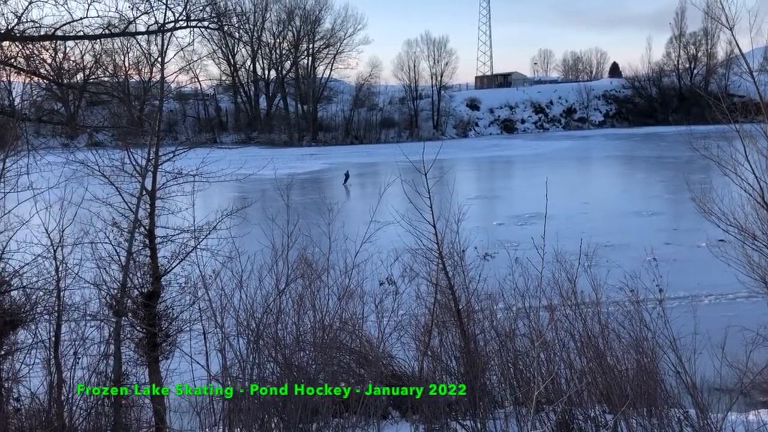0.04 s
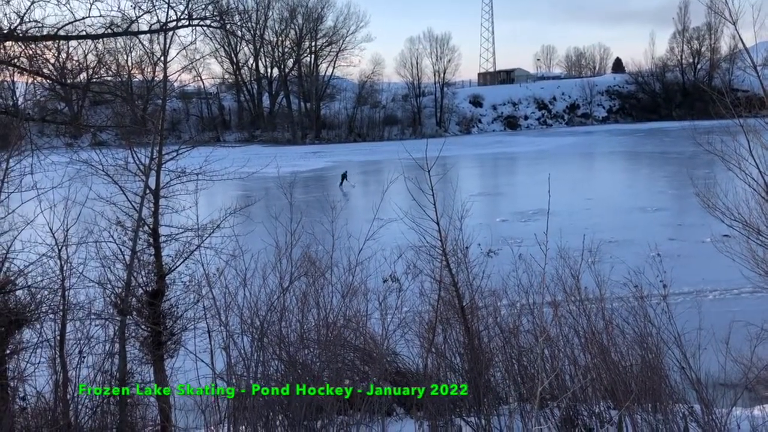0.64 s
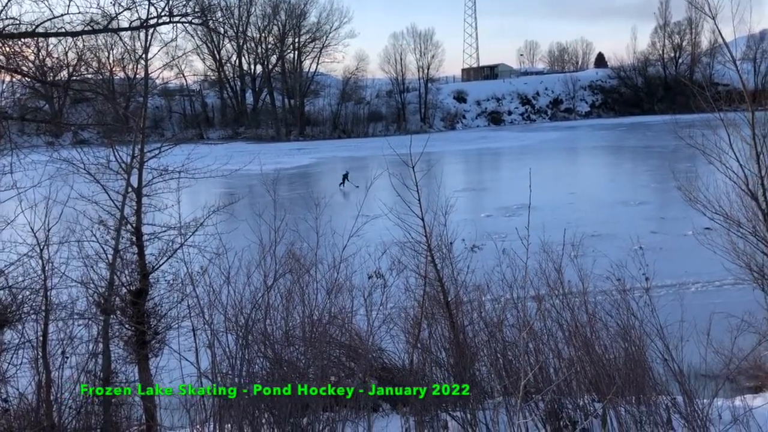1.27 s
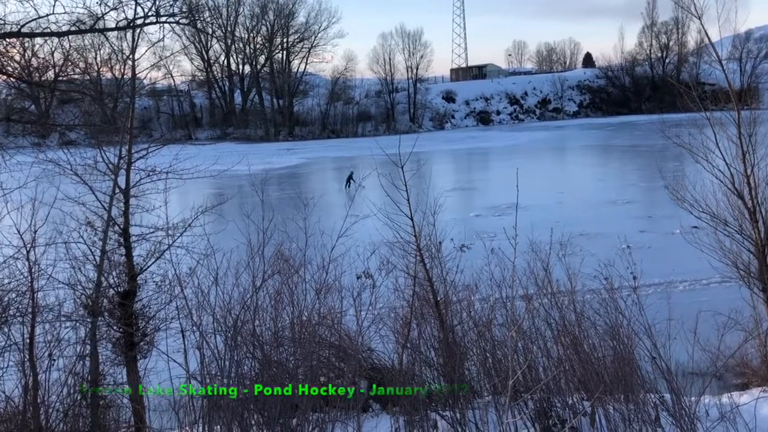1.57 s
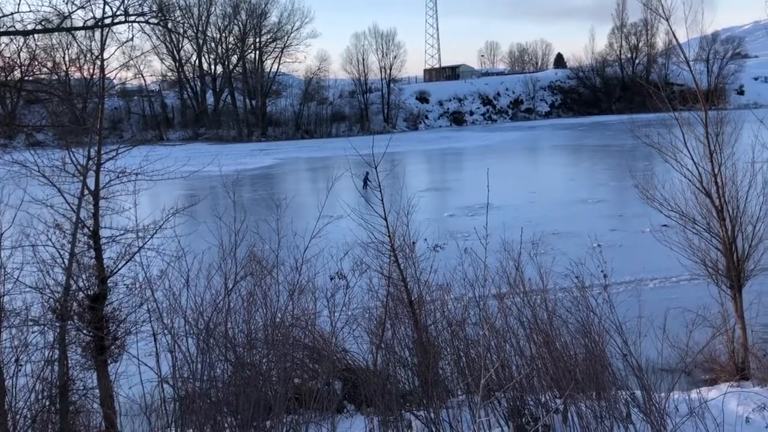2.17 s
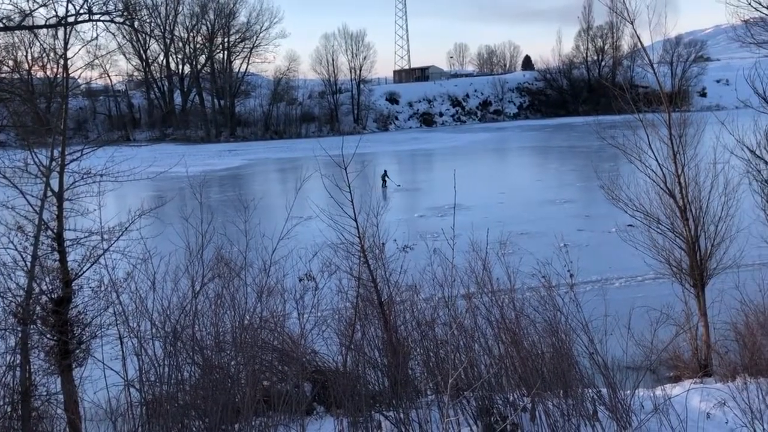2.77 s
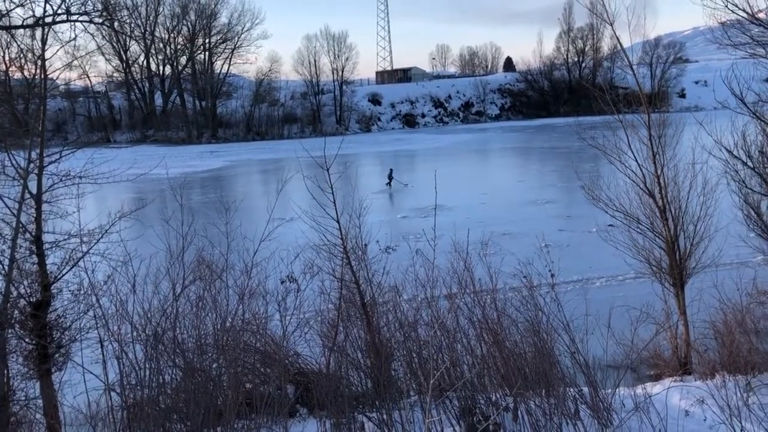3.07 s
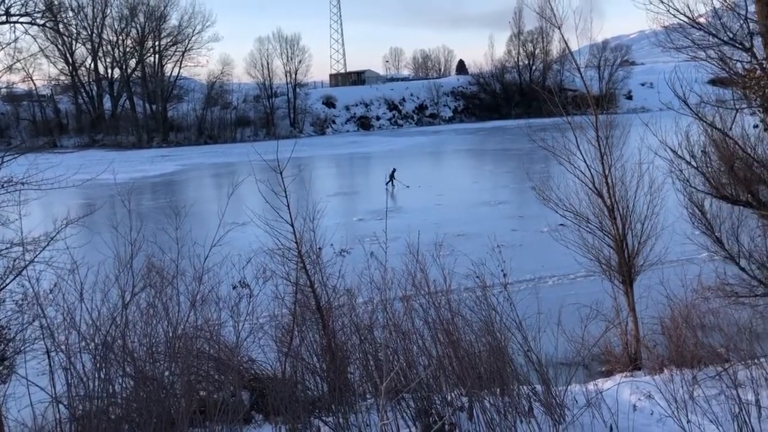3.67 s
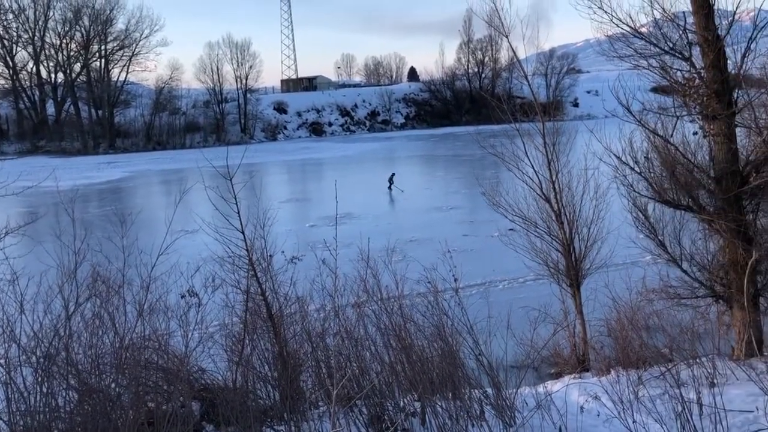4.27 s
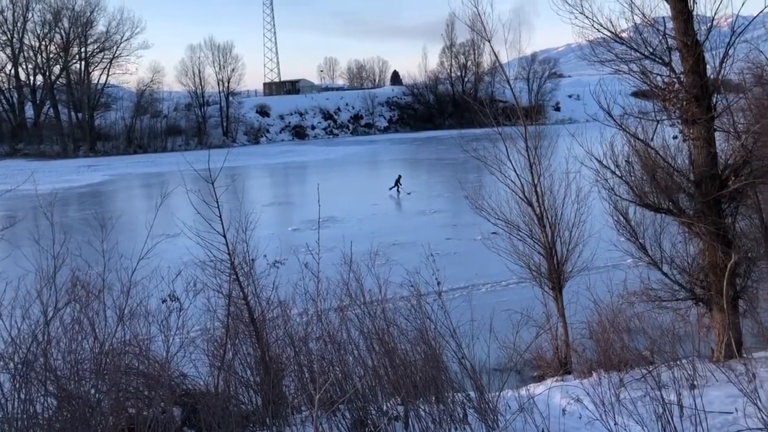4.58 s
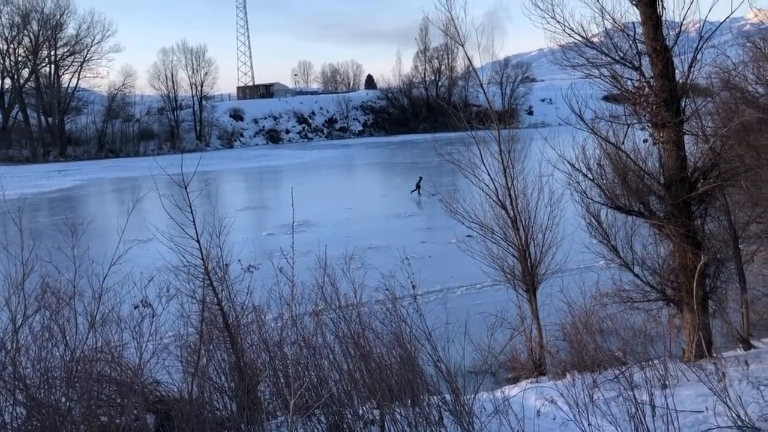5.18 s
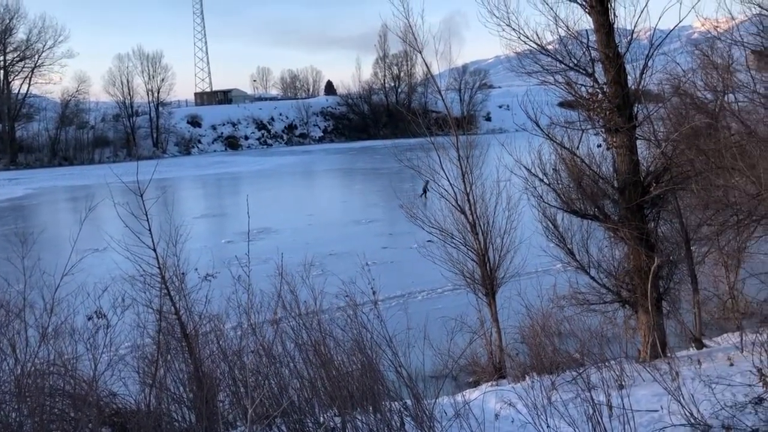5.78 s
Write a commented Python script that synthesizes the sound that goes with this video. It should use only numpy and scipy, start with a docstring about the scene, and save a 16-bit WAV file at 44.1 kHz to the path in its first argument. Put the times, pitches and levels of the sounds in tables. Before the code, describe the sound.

A distant hockey stick clacks a puck across a frozen lake, with short chirps in the ice, skate scrapes and a low outdoor rumble.

```python
"""A lone skater plays a hockey puck across a frozen lake, heard from the bank.
For three seconds stick and puck clack; each blow sends a short falling chirp through the ice,
and the wooded shore scatters it back. The hardest, at 2.5 s, knocks ice crystals loose.
Then the skater pushes off with scraping strokes and softer taps, and the ring of the blades fades.
A low outdoor rumble, a far hum and a faint whirr run throughout."""
import sys
import numpy as np
from scipy import signal
from scipy.fft import rfft, irfft, next_fast_len
from scipy.io import wavfile
from scipy.ndimage import uniform_filter1d

SR = 44100
rng = np.random.default_rng(int(sys.argv[2]) if len(sys.argv) > 2 else 0)


def transcribe(u):
    """Save the signal u as a 16-bit wav file named by the first command-line argument.

    u: samples, shape (n,) or (channels, n), limited to [-1, 1]; the rate is SR.
    q: integer samples, one column per channel.
    """
    v = np.clip(np.atleast_2d(u).T, -1, 1)
    q = np.round(v * 32767).astype(np.int16)
    wavfile.write(sys.argv[1], SR, q)


N = 257103
TIME = np.arange(N) / SR
SLOW = np.arange(0, N + 64, 64) / SR  # control grid in seconds

# Knocks of stick, puck and skate, plus one quick bank echo at 1.955 s.
# Each row: start in seconds, force in dB, brightness in dB, ice chirp in dB, edge tick in dB,
# tuning factor, rebound delay in ms, hollow band in Hz, shore send in dB.
KNOCK_EVENTS = [(0.2467, -10, 7, -25, -27.5, 0.93, 0.49, 1420, -1.5),
                (0.48, 1, 0, -15, -20.5, 0.92, 1.67, 3200, -5),
                (0.523, -6.0, -6, -16.5, -28, 0.9, 1.9, 980, -12),
                (0.7358, -1, -1, -13, -25, 0.9, 0.45, 2550, 2),
                (0.738, -7, 15.5, -38, -43, 1.02, 2.0, 2450.0, -6.5),
                (0.808, -3, -2.5, -8.5, -28, 0.87, 1.7, 2830.0, -9),
                (0.8442, -17, -7.5, -13.5, -41, 1, 0.52, 4060.0, -5),
                (1.0424, 4.0, 2.5, -17, -23, 0.92, 1.5, 4650, 0.0),
                (1.1163, -0.5, 3, -7, -39, 0.86, 0.56, 1520, -8),
                (1.3306, -2.5, 0.5, -10.5, -31, 0.98, 1.17, 780, 1),
                (1.3753, -3, 2.5, -2, -25, 0.76, 0.3, 1690, -6.5),
                (1.3826, -13, 4, -32, -50, 1, 0.53, 900, -6), (1.4, -7.5, -5, -17, -52, 0.67, 1, 1050, -3),
                (1.4179, -20, -10.0, -10, -42, 0.96, 2.1, 1410.0, -8),
                (1.577, 2.0, -2, -26, -23, 1, 1.6, 810, 1.0),
                (1.582, -1.5, -10, -16, -46.0, 0.8, 1.82, 820, -3.5),
                (1.6315, -4, -5, -9, -35, 0.79, 1.5, 1670.0, -6.5),
                (1.6508, -11.0, 4, -25, -43.0, 1.17, 1, 1600.0, 0.0),
                (1.6599, -9, -4.5, -30.0, -50.0, 1.05, 0.47, 2970.0, -8),
                (1.6835, -11, -1, -30.0, -50.0, 1, 0.51, 1470.0, -3),
                (1.7052, -19.5, 8, -8.5, -45.5, 1, 0.42, 880.0, -8),
                (1.888, 3.5, -0.5, -29, -27.5, 1.08, 1.09, 870, -3),
                (1.9397, 1, 3.5, -2, -21.5, 0.74, 1.56, 3330, -3.5),
                (1.9554, -9, 1, -18, -45, 0.85, 0.65, 2600, -6),
                (2.006, -8.5, -7, -15, -37, 0.53, 0.5, 900.0, -7),
                (2.111, -11, -9, -27, -36, 0.95, 1.05, 1870, 1),
                (2.1693, 2.0, -9, -15, -20, 1.08, 1.2, 900, 1.5),
                (2.2387, -12.5, -4.5, -29, -49.0, 1.1, 0.74, 3960.0, 6),
                (2.2615, -5, 2.5, -9, -29.5, 1.17, 0.42, 2440.0, 0.0),
                (2.516, 7.3, 3, -7.0, -36, 1.064, 1.05, 4300, -2.5),
                (2.739, -7, -2.5, -15, -49, 1.03, 0.81, 5000.0, -1),
                (2.749, -16, 3, -28, -50, 1.05, 0.55, 1300, -3),
                (2.7674, -14.5, 6, -16, -43, 1, 0.69, 1430.0, -8),
                (2.7872, -15, -1, -23, -47.0, 1.16, 1.66, 2440, 0),
                (2.7985, -18, 0, -28, -46, 1.1, 0.75, 1500, -3),
                (2.9005, -15, -2, -13, -47, 1.1, 0.63, 3170.0, 6),
                (2.905, -15, -0.5, -27, -45, 1.1, 1.2, 2500, 3),
                (2.9553, -15, -6.0, -18, -49.5, 1.34, 0.56, 1660.0, 0),
                (2.9957, -8, -8, -4.5, -32, 1.02, 0.43, 1290.0, -4),
                (3.008, -19, -1, -24, -44, 0.96, 0.7, 1500, -1),
                (3.8301, -13.5, 5.5, -30.0, -44, 0.82, 1.76, 2550, 4.5),
                (3.8485, -22, -11, -16.5, -60, 0.74, 1.3, 2395, 3),
                (3.931, -18, 2, -14, -48, 0.9, 1.6, 1900, 1),
                (3.958, -23, -10, -13.5, -60, 0.81, 0.8, 2190, 2),
                (3.9875, -17.5, -7, -14, -60, 0.82, 0.74, 2800, 1),
                (4.008, -18, -10, -21, -60, 0.96, 0.78, 2500, 3),
                (4.059, -20, -12, -6.5, -55, 1.1, 0.73, 1900, -2),
                (4.081, -19, -12, -20, -60, 0.95, 0.6, 2800, -7),
                (4.647, -11.5, -8, -22, -33, 1.07, 1.73, 2190, 4.5),
                (4.71, -18, -2, -14, -48.5, 0.97, 1.3, 1880.0, 6),
                (4.7878, -14.5, -8, -23, -44, 1.15, 0.72, 3210, 0.5),
                (4.8399, -24, 10, -19.0, -55, 0.85, 0.39, 2030.0, -3.5)]


def knocks():
    """All knocks, as heard directly and as sent towards the shore."""
    direct, outward = np.zeros((2, N))
    lead_samples = 128  # room for the graze before the hit
    for start_s, *settings, send_db in KNOCK_EVENTS:
        sound = np.roll(blow(*settings), lead_samples)
        add(direct, start_s - lead_samples / SR, sound)
        add(outward, start_s - lead_samples / SR, amp(send_db) * sound)
    return direct, outward


def blow(force_db, bright_db, ice_db, tick_db, tuning, rebound_ms, hollow_hz):
    """One blow rings the stick, chips the surface and bends the ice."""
    hz = np.fft.rfftfreq(4096, 1 / SR)
    clack = stick(hz, force_db, bright_db, tuning, hollow_hz) * contact(hz, force_db, rebound_ms)
    return irfft(clack + edge_tick(hz, tick_db) + ice_chirp(hz, ice_db))


# Low, main and high mode of the stick blade. Each row: centre in Hz before tuning, width in Hz.
STICK_MODES = [(1180, 850), (1900, 1150), (3200, 1530)]
# Hollow wooden shaft modes. Each row: centre in Hz, width in Hz, level in dB at 0 dB force.
SHAFT_MODES = [(1135, 230, -4), (3460, 260, -17)]


def stick(hz, force_db, bright_db, tuning, hollow_hz, radiate_hz=400, lag_s=0.00121):
    """Spectrum of the ringing blade and shaft; the main mode grows faster than the force."""
    modes_db = (force_db - 3.8 - 0.25 * bright_db, 1.388 * force_db, force_db - 10 + bright_db)
    power = sum((amp(db) * bell(hz, centre * tuning, width)) ** 2
                for db, (centre, width) in zip(modes_db, STICK_MODES))
    power += sum((amp(db + force_db) * bell(hz, centre, width)) ** 2 for centre, width, db in SHAFT_MODES)
    power /= 1 + (radiate_hz / (hz + 1)) ** 4  # a thin stick radiates little bass
    hollow = 1 - 0.83 * bell(hz, hollow_hz, 0.13 * hollow_hz)  # the struck spot leaves one band weak
    delay_s = lag_s / (1 + hz / STICK_MODES[1][0])  # the stick bends, so low modes sound late
    return causal(np.sqrt(power) * hollow) * np.exp(-2j * np.pi * hz * delay_s)


def contact(hz, force_db, rebound_ms, graze_s=0.00076, rebound_top_hz=4200, crunch_top_hz=5000):
    """Spectrum of the contact: a graze, crunching ice, the unit hit and a softer rebound."""
    graze = 0.22 * np.exp(2j * np.pi * hz * graze_s * rng.uniform(0.7, 1.3))
    crunch = amp(-11 - 0.24 * force_db) * burst(hz, decay_s=0.0026)
    crunch *= np.exp(2j * np.pi * hz * graze_s) / (1 + (hz / crunch_top_hz) ** 2)
    rebound = 0.47 * np.exp(-(hz / rebound_top_hz) ** 2 - 2j * np.pi * hz * rebound_ms / 1000)
    return graze + crunch + 1 + rebound


# Tick of hard edges. Each row: frequency in Hz, gain in dB.
TICK_COLOUR = [(1500, -25), (4000, 6), (6000, 1), (8000, -7), (11000, -13), (16000, -24)]


def edge_tick(hz, db, chip_gain=0.85):
    """Spectrum of hard edges meeting: one sharp snap, then flying chips."""
    snap = np.sqrt(1 - chip_gain ** 2)
    chips = chip_gain * burst(hz, decay_s=0.0011)
    return (snap + chips) * causal(amp(db + read(TICK_COLOUR, hz)))


# Bending wave of the ice sheet. Each row: frequency in Hz, gain in dB.
CHIRP_COLOUR = [(60, -39), (120, -24), (190, -6), (300, 7), (450, -1.5), (650, -0.5), (950, -11.5),
                (1600, -61), (4000, -72)]


def ice_chirp(hz, db, spread_s=0.00519, lag_s=0.00072, reference_hz=1000):
    """Spectrum of a bending wave: speed goes with the root of frequency, so lows arrive last."""
    turns = spread_s * (2 * np.sqrt(reference_hz * hz) - hz) + lag_s * hz
    return amp(db + read(CHIRP_COLOUR, hz)) * np.exp(-2j * np.pi * turns)


# Each row: start in seconds, pitch in Hz, t60 in seconds, level in dB.
RINGING_MODES = [(.7382, 3550, 0.024, -31), (.7382, 2890, 0.015, -40), (0.7393, 4050, .012, -41),
                 (0.736, 8800, 0.004, -43), (1.0429, 10700, 0.0024, -35.5), (1.0429, 3430, 0.016, -41),
                 (1.3751, 8000, 0.002, -39), (1.4, 1110, 0.031, -45), (2.1694, 2300, 0.015, -52),
                 (2.516, 2900, 0.015, -36), (2.515, 3690, 0.011, -32)]


def rings():
    """Hard hits set the shaft or a steel runner ringing briefly."""
    t, out = TIME[:SR // 10], np.zeros(N)
    for start_s, hz, t60_s, db in RINGING_MODES:
        add(out, start_s, amp(db) * np.sin(2 * np.pi * hz * t) * decay(t, t60_s))
    return out


# Skate strokes. Each row: peak time in seconds, length in seconds, scrape in dB, spray in dB.
SKATE_STROKES = [(0.179, 0.026, -56.5, -77), (0.358, 0.16, -68.5, -72), (1.012, 0.026, -56.5, -73),
                 (2.66, 0.039, -61, -77), (2.709, 0.019, -53.5, -69), (2.792, 0.063, -58.5, -76),
                 (3.013, 0.07, -64, -71), (3.479, 0.028, -62.5, -68.5), (3.586, 0.044, -50.5, -69),
                 (3.728, 0.28, -61.5, -85), (3.891, 0.015, -56, -80), (4.042, 0.034, -58.5, -85),
                 (4.186, .03, -74, -71), (4.577, 0.057, -53, -78), (5.115, 0.061, -55.5, -84),
                 (5.688, 0.054, -53.5, -72)]
# Scraping blade and its ice spray. Each row: frequency in Hz, gain in dB.
SCRAPE_COLOUR = [(200, -34), (500, -22), (800, -2.5), (960, -7), (1130, 2.5), (1400, -0.5), (1700, -2.5),
                 (2100, -6.5), (3000, -12), (3600, -11.5), (5000, -16), (6500, -29.5), (16000, -38)]
SPRAY_COLOUR = [(1500, 2), (4500, 10), (6500, 4), (8500, 7.5), (11000, -4), (16000, -7)]


def strokes(rise_share=0.57, roundness=1.56):
    """Each push swells into a gritty scrape and throws spray."""
    scrape_power, spray_power = np.zeros((2, len(SLOW)))
    for peak_s, length_s, scrape_db, spray_db in SKATE_STROKES:
        slope_s = length_s * np.where(SLOW < peak_s, rise_share, 1 - rise_share)
        push = np.exp(-(abs(SLOW - peak_s) / slope_s) ** roundness)
        scrape_power += push * amp(scrape_db) ** 2
        spray_power += push * amp(spray_db) ** 2
    bite = unit(friction(patchy_db=3.6, chatter_db=2.8)) + grit(per_s=480, spread_db=2.3)
    scratch = unit(friction(patchy_db=3.2, chatter_db=4.5)) + 0.7 * grit(per_s=220, spread_db=2.5)
    scrape = smooth(np.sqrt(scrape_power)) * equalised(bite, SCRAPE_COLOUR)
    spray = smooth(np.sqrt(spray_power)) * equalised(scratch, SPRAY_COLOUR)
    return scrape + spray


def carve(pitch_hz=1220, width_hz=380, relative_db=-7.5, climb_share=0.14):
    """The edge digs in before each scrape with a narrow ring that climbs with pressure."""
    power, pressure = np.zeros((2, len(SLOW)))
    for peak_s, length_s, scrape_db, _ in SKATE_STROKES:
        dig_s = peak_s - 0.73 * length_s
        power += amp(scrape_db + relative_db) ** 2 * np.exp(-((SLOW - dig_s) / (0.63 * length_s)) ** 2)
        pressure = np.maximum(pressure, np.exp(-(2 * (SLOW - peak_s) / length_s) ** 2))
    slips = coloured(rng.standard_normal(N), lambda hz: bell(hz, 0, width_hz))
    return smooth(np.sqrt(power)) * unit(slips * tone(pitch_hz * (1 + climb_share * pressure)))


# Skate blade modes. Each row: centre in Hz, width in Hz, gain in dB.
RUNNER_MODES = [(758, 480, -8), (1230, 210, -11), (1884, 380, 2), (3280, 2200, -27)]
# Glide envelope. Each row: time in seconds, level in dB.
GLIDE_FADE = [(0, -64), (.2, -59), (.45, -62), (.7, -64), (1.3, -66.5), (2.5, -73.5), (5.83, -88)]


def glide(waver_db=0.7):
    """Friction rings the gliding blades; they fade as the skater moves off."""
    ring = resonated(friction(patchy_db=3.5, chatter_db=2.6), RUNNER_MODES)
    level_db = np.interp(SLOW, *np.transpose(GLIDE_FADE)) + waver_db * drift(rate_hz=3.9)
    return smooth(amp(level_db)) * ring


def friction(patchy_db, chatter_db):
    """A blade catches on uneven ice: brief patches at their own pitches, and a shared chatter."""
    frames = dict(fs=SR, nperseg=512, noverlap=384)
    spectra = signal.stft(rng.standard_normal(N), **frames)[2]
    patches = uniform_filter1d(rng.standard_normal(spectra.shape), size=4, axis=0)
    patches = unit(uniform_filter1d(patches, size=5, axis=1))
    rub = signal.istft(spectra * amp(patchy_db * np.clip(patches, -2, 2)), **frames)[1]
    return rub[:N] * smooth(amp(chatter_db * drift(rate_hz=69)))


def grit(per_s, spread_db):
    """Tiny ice fractures: random clicks, a few larger than the rest."""
    sizes = amp(spread_db * np.minimum(rng.exponential(1, N), 3.5))
    return unit(sizes * impulses(N, per_s))


# Each row: start in seconds, centre in Hz, width in Hz, t60 in seconds, level in dB.
CRYSTAL_SHOWERS = [(2.52, 5400, 3200, .5, -67), (2.6995, 10500, 7010, .04, -62.5),
                   (2.707, 11000, 7000, .06, -72.5), (2.768, 13000, 6000, .06, -72),
                   (2.78, 9700, 1800, 0.55, -77), (3.007, 11800, 7000, .03, -68)]


def showers():
    """Crystals knocked loose by stick or blade burst out and skitter to rest."""
    out = np.zeros(N)
    for start_s, centre_hz, width_hz, t60_s, db in CRYSTAL_SHOWERS:
        grains = coloured(grit(per_s=5000, spread_db=2), lambda hz: bell(hz, centre_hz, width_hz))
        add(out, start_s, amp(db) * grains * decay(TIME, t60_s))
    return out


# Tiny fractures. Each row: frequency in Hz, gain in dB.
CRACKLE_COLOUR = [(300, -14), (1200, 0), (3500, 0), (5500, -9), (8000, -19), (16000, -36)]


def crackle(db=-70, fade_db_per_s=0.74, snap_s=0.0016):
    """The ice ticks faintly under the runners all the way."""
    fractures = grit(per_s=100, spread_db=3.4)
    snap = rng.standard_normal(400) * np.exp(-TIME[:400] / snap_s)
    ticks = signal.fftconvolve(fractures, snap)[:N]
    return amp(db - fade_db_per_s * TIME) * equalised(ticks, CRACKLE_COLOUR)


# The bank's slap comes later as the skater moves. Each row: time in seconds, delay in seconds.
SLAP_DELAY = [(.5, 0.0091), (1.05, 0.011), (1.65, 0.011), (1.85, .015), (2.5, 0.015)]
# Side shore decay. Each row: frequency in Hz, t60 in seconds.
SHORE_DECAY = [(200, 0), (1000, 0.53), (2500, 0.33), (5000, 0.17), (12000, 1.2)]
# Scatter from both shores. Each row: frequency in Hz, gain in dB.
ECHO_COLOUR = [(150, -7), (450, -11), (680, 9.5), (950, -1), (1300, -.5), (1900, 0.5), (3200, 2), (4200, 3),
               (5300, 0.5), (6800, -5), (9000, -5), (16000, -2)]


def lake(direct, outward, bank_db=-15, bank_top_hz=3500, brush_db=-15, shore_db=-10, far_db=-19):
    """The near bank adds one slap, the brush a brief smear, the side and far shores a long tail."""
    delay_s = np.interp(TIME, *np.transpose(SLAP_DELAY))
    slap = np.interp(TIME - delay_s, TIME, direct)
    slap = signal.lfilter(*signal.butter(1, bank_top_hz, fs=SR), slap)
    brush = scatter(direct, [(300, 0.05), (8000, 0.035)], [(300, -1), (3000, 0), (12000, -1)],
                    start_s=0.0015, build_s=0.0005, uneven_db=3)
    shore = scatter(outward, SHORE_DECAY, ECHO_COLOUR, start_s=0.009, build_s=0.004, uneven_db=4.6)
    far = scatter(outward, [(300, 0.5), (2000, 0.54), (9000, 0.93)], ECHO_COLOUR,
                  start_s=0.06, build_s=0.0081, uneven_db=4)
    return direct + amp(bank_db) * slap + amp(brush_db) * brush + amp(shore_db) * shore + amp(far_db) * far


def scatter(x, t60_by_hz, db_by_hz, start_s, build_s, uneven_db, paths=3, switch_hz=4):
    """Uneven echoes build up and die band by band; paths take turns as the skater moves."""
    out = np.zeros(N)
    for path in range(paths):
        taps = impulses(SR, per_s=1700) * amp(uneven_db * np.clip(rng.standard_normal(SR), -2, 2))
        taps *= 1 - np.exp(-TIME[:SR] / build_s)
        hz, t, spectra = signal.stft(taps, SR, nperseg=128)
        t60_s = np.maximum(read(t60_by_hz, hz), 1e-3)[:, None]
        tail = signal.istft(spectra * decay(t, t60_s) * amp(read(db_by_hz, hz))[:, None], SR)[1]
        active = np.floor(TIME * switch_hz) % paths == path
        add(out, start_s, signal.fftconvolve(x * active, tail / np.linalg.norm(tail)))
    return out


# Open air. Each row: frequency in Hz, gain in dB.
AIR_COLOUR = [(20, -42), (30, -39), (40, -11), (65, -8.5), (130, 3), (240, -1), (450, -11.5), (650, -11),
              (900, -15), (1300, -16.5), (2400, -22.5), (4000, -27.5), (6500, -35.5), (11000, -41.5),
              (16000, -44)]
# Rumble envelope. Each row: time in seconds, level in dB.
RUMBLE_SWELL = [(0, -56.5), (.7, -58), (2.6, -55), (3.5, -59.5), (5, -55.5), (5.83, -56.5)]


def air(swell_db=1.1, hiss_db=-57, split_hz=900):
    """Open air: a swelling low rumble under a steady thin hiss."""
    wash = equalised(rng.standard_normal(N), AIR_COLOUR)
    rumble = signal.sosfiltfilt(signal.butter(2, split_hz, fs=SR, output="sos"), wash)
    rumble_db = np.interp(SLOW, *np.transpose(RUMBLE_SWELL)) + swell_db * drift(rate_hz=2.35)
    return smooth(amp(rumble_db)) * rumble + amp(hiss_db) * (wash - rumble)


def hum(db=-65.3, pitch_hz=112.3, wander_hz=4, waver_db=2):
    """A far hum wavers in pitch and level."""
    sine = tone(pitch_hz + wander_hz * drift(rate_hz=9.5))
    return amp(db) * unit(sine * smooth(amp(waver_db * drift(rate_hz=2.5))))


# Each row: centre in Hz, width in Hz, gain in dB.
WHIRR_BANDS = [(1183, 160, -0.5), (1600, 105, 0)]


def whirr(db=-71):
    """Two faint narrow noise bands from far away."""
    return amp(db) * resonated(rng.standard_normal(N), WHIRR_BANDS)


def amp(db):
    """Decibels to gain."""
    return 10 ** (db / 20)


def unit(x):
    """Scales to rms 1."""
    return x / np.sqrt(np.mean(x ** 2) + 1e-20)


def read(points, hz):
    """Reads a table on a log-frequency axis."""
    knots_hz, values = np.transpose(points)
    return np.interp(np.log(hz + 1), np.log(knots_hz + 1), values)


def add(mix, start_s, sound):
    """Mixes a sound in at start_s."""
    part = mix[max(round(start_s * SR), 0):][:len(sound)]
    part += sound[:len(part)]


def bell(hz, centre, width):
    """Gain of one damped resonance."""
    return 1 / (1 + (2 * (hz - centre) / width) ** 2)


def decay(t, t60_s):
    """Falls 60 dB in t60_s."""
    return amp(-60 * t / t60_s)


def coloured(x, gain):
    """Filters x by a function of frequency, to rms 1."""
    size = next_fast_len(N, real=True)
    hz = np.fft.rfftfreq(size, 1 / SR)
    knots = np.geomspace(10, SR / 2, 1000)
    return unit(irfft(rfft(x, size) * np.interp(hz, knots, gain(knots)), size)[:N])


def equalised(x, colour):
    """Filters x by a (Hz, dB) curve, to rms 1."""
    return coloured(x, lambda hz: amp(read(colour, hz)))


def resonated(x, modes):
    """Filters x by parallel resonances, to rms 1."""
    return coloured(x, lambda hz: sum(amp(db) * bell(hz, centre, width) for centre, width, db in modes))


def causal(gain):
    """Minimum-phase spectrum: the most sudden pulse with this gain."""
    log_gain = np.log(np.maximum(np.r_[gain, gain[-2:0:-1]], 1e-5))
    return np.exp(np.conj(signal.hilbert(log_gain)))[:len(gain)]


def burst(hz, decay_s):
    """Spectrum of a dying noise burst of unit energy."""
    size = 2 * (len(hz) - 1)
    noise = rng.standard_normal(size) * np.exp(-TIME[:size] / decay_s)
    return rfft(noise / np.linalg.norm(noise))


def impulses(size, per_s):
    """Impulses of random sign and timing."""
    return rng.choice([-1., 1.], size) * (rng.random(size) < per_s / SR)


def drift(rate_hz):
    """Random motion of rms 1 on the control grid."""
    hz = np.fft.rfftfreq(len(SLOW), SLOW[1])
    return unit(irfft(rfft(rng.standard_normal(len(SLOW))) * np.exp(-(hz / rate_hz) ** 2), len(SLOW)))


def smooth(curve):
    """Control grid to audio rate."""
    return np.interp(TIME, SLOW, curve)


def tone(pitch_hz):
    """Sine that follows a pitch on the control grid."""
    return np.sin(2 * np.pi * np.cumsum(smooth(pitch_hz)) / SR)


def scene():
    """Knocks across the lake, skates and open air, in mono."""
    skater = lake(*knocks()) + rings() + strokes() + glide() + carve() + crackle() + showers()
    return (skater + air() + hum() + whirr())[None]


def record(dry, top_hz=16000):
    """Steep low-pass band limit."""
    lowpass = signal.firwin(511, top_hz, window=("kaiser", 9), fs=SR)
    return signal.oaconvolve(dry, lowpass[None], "same")


dry = scene()
out = record(dry)
transcribe(out)
```